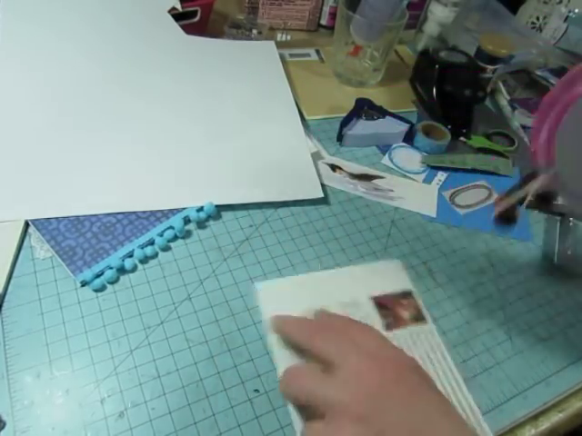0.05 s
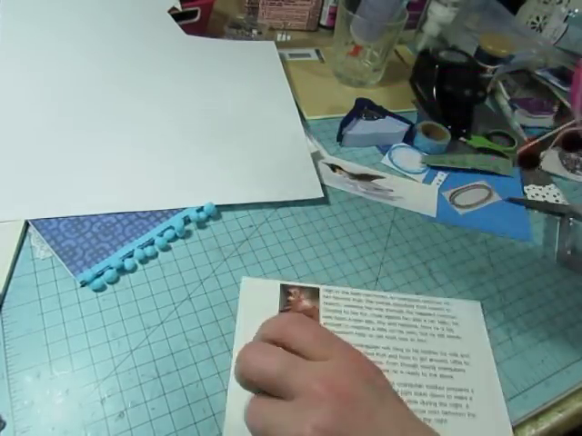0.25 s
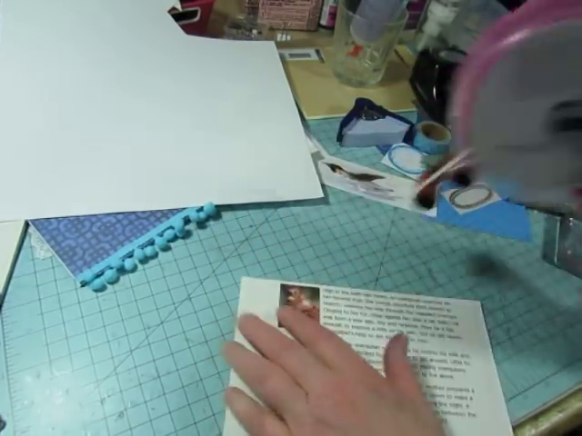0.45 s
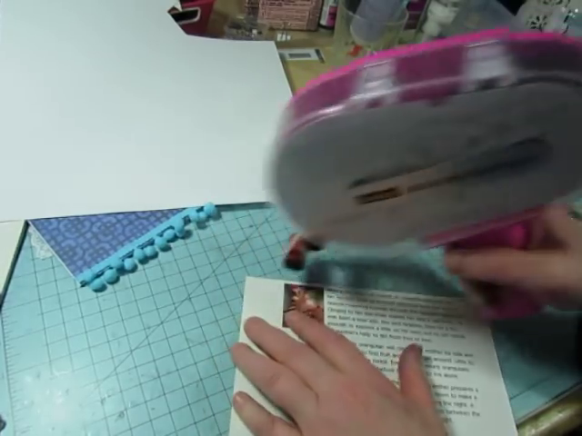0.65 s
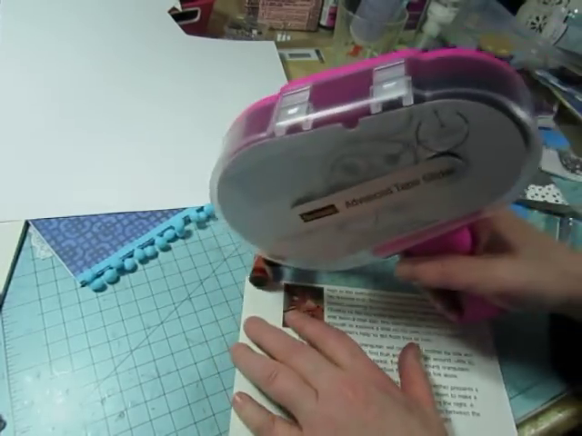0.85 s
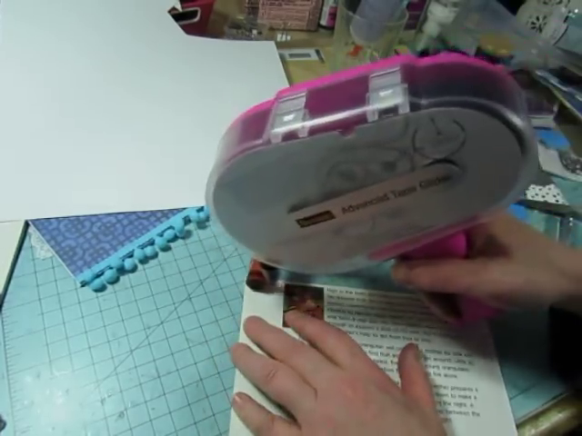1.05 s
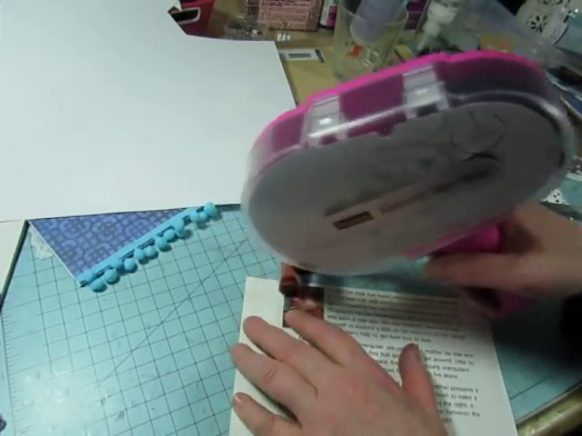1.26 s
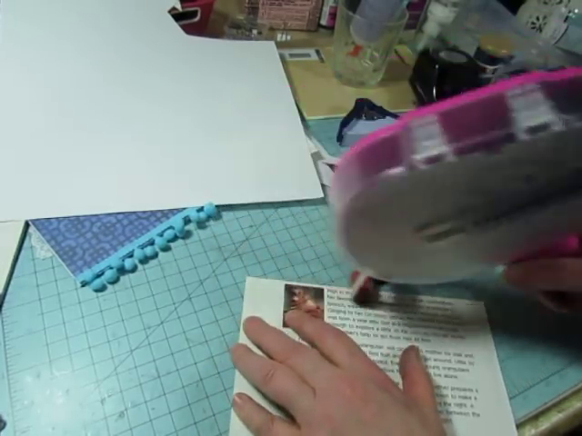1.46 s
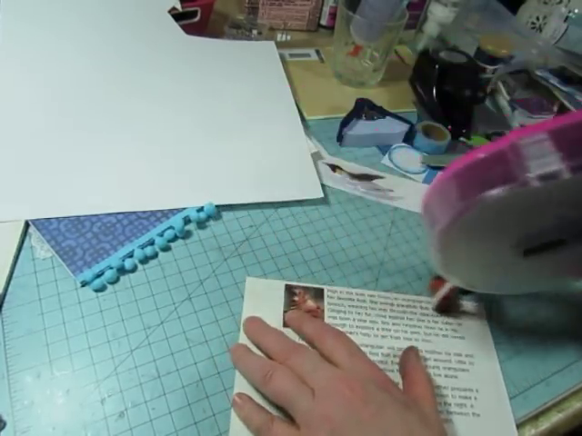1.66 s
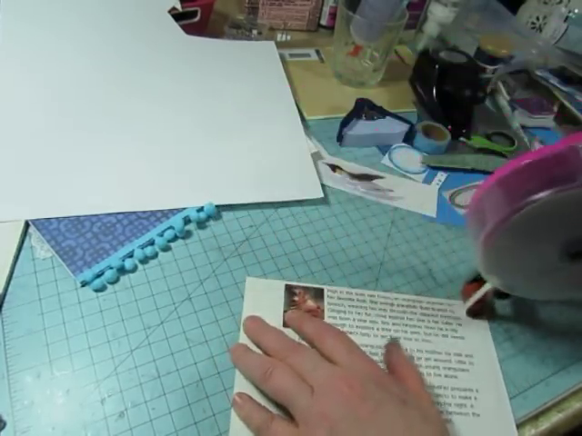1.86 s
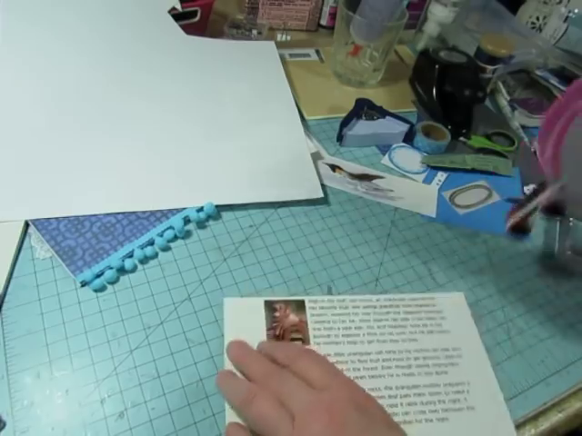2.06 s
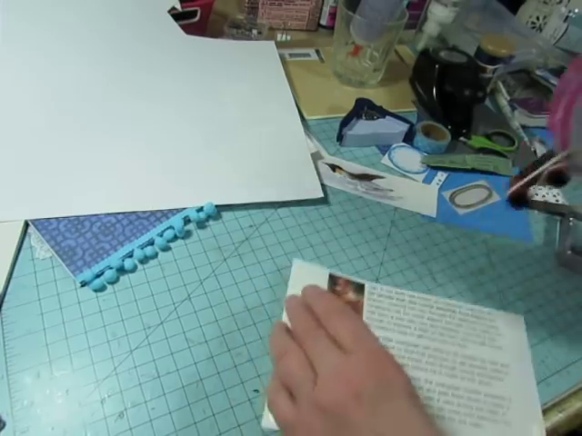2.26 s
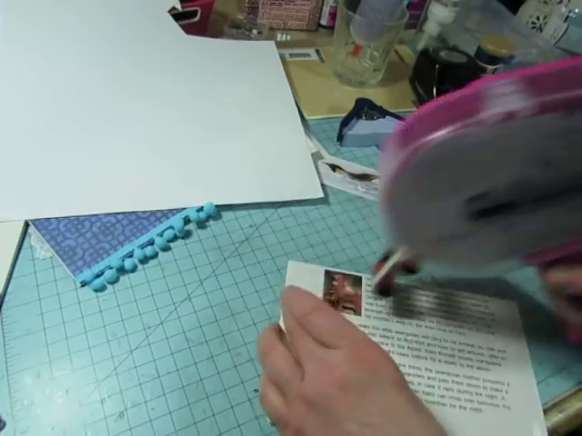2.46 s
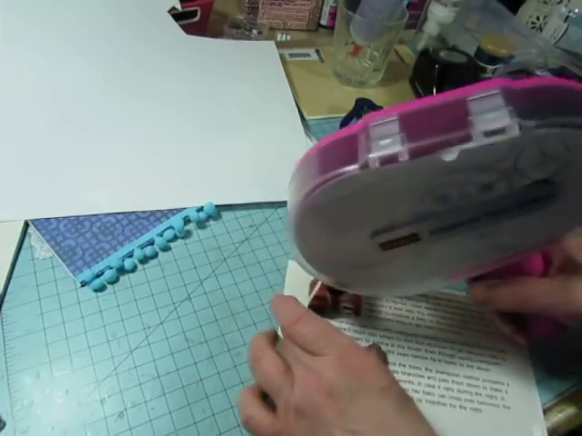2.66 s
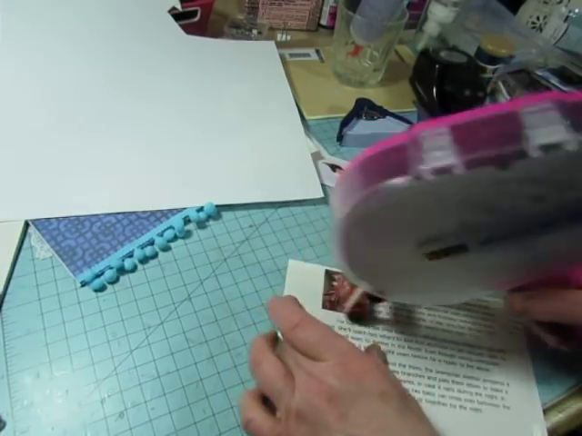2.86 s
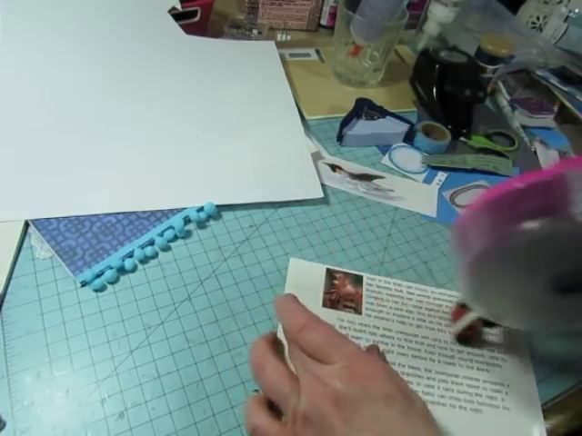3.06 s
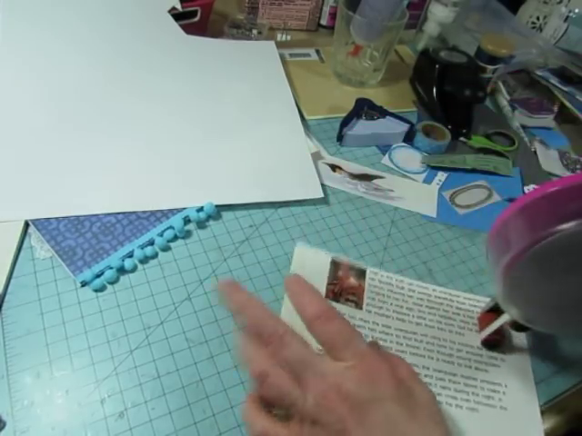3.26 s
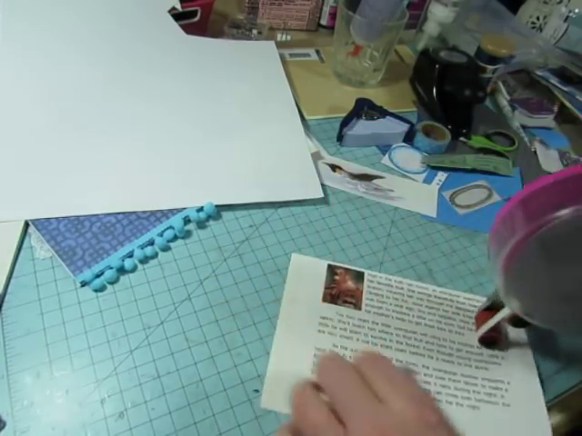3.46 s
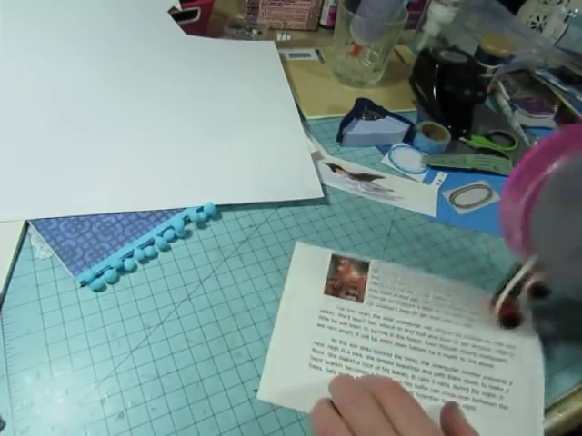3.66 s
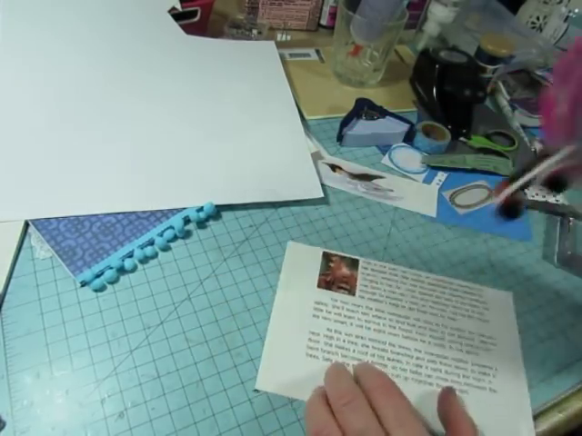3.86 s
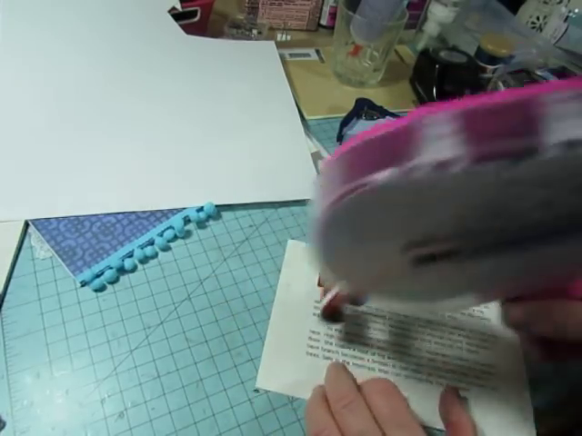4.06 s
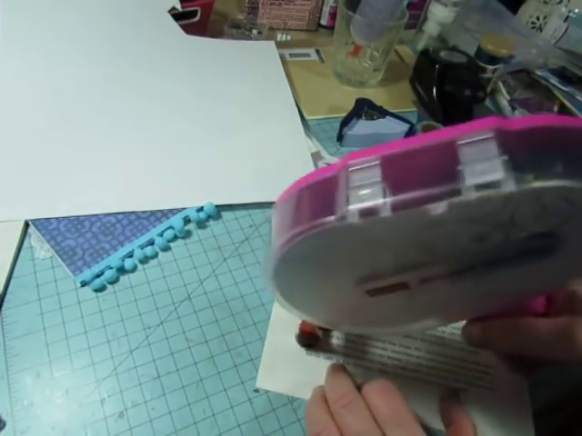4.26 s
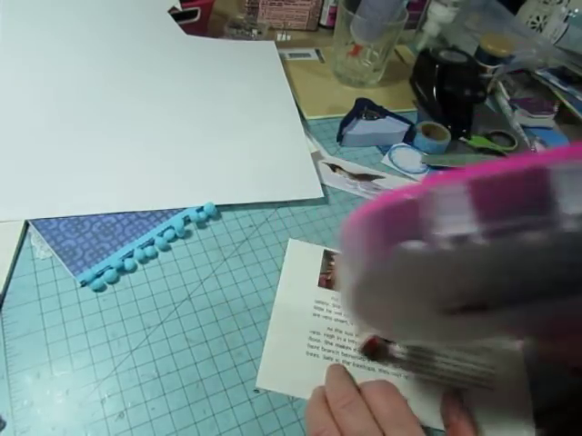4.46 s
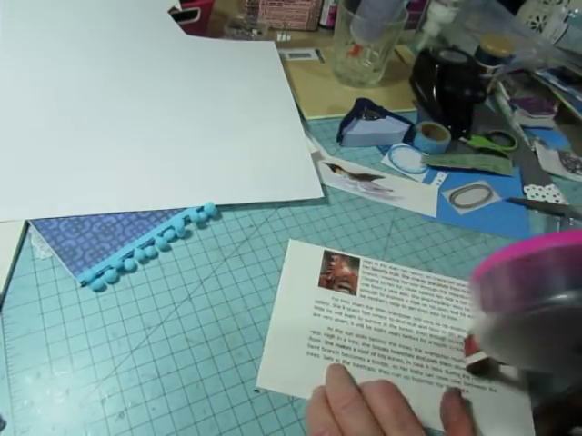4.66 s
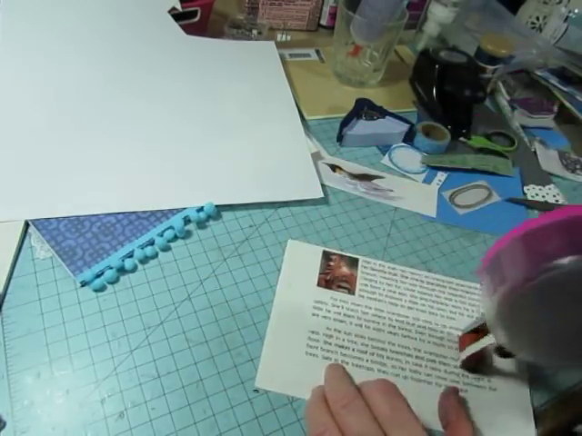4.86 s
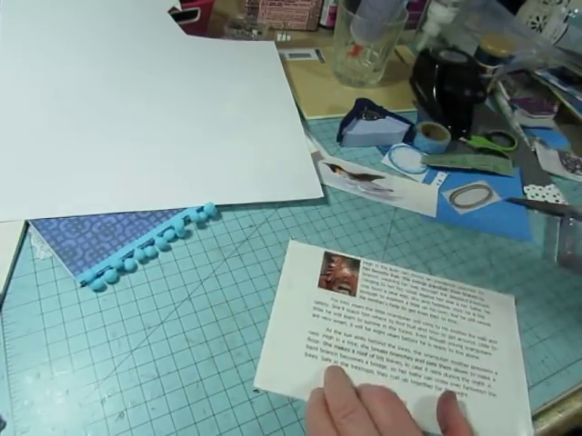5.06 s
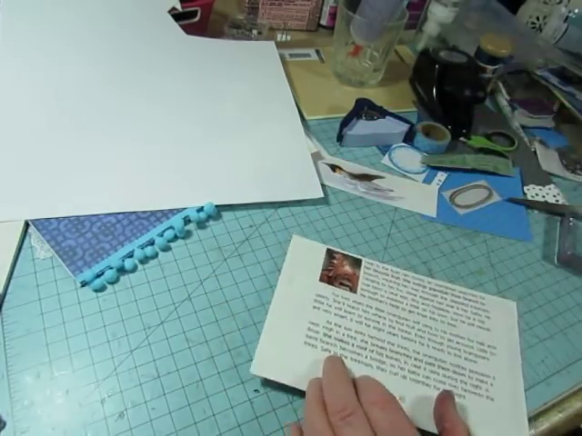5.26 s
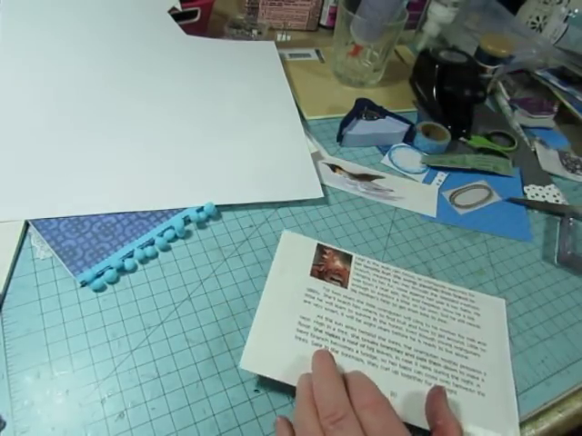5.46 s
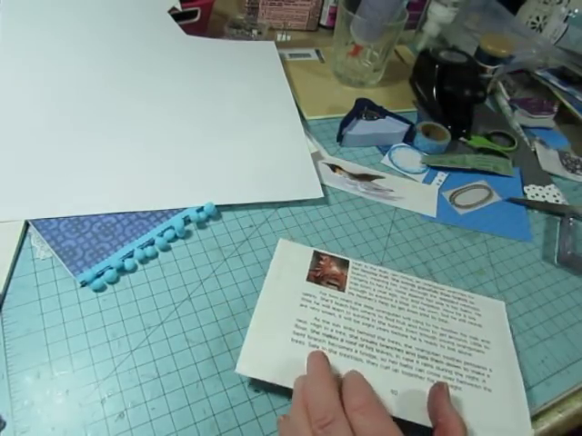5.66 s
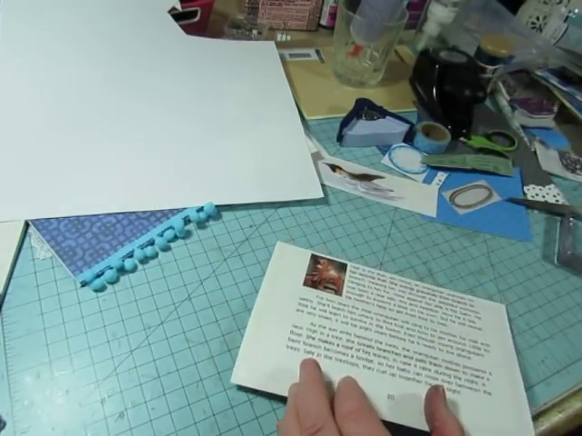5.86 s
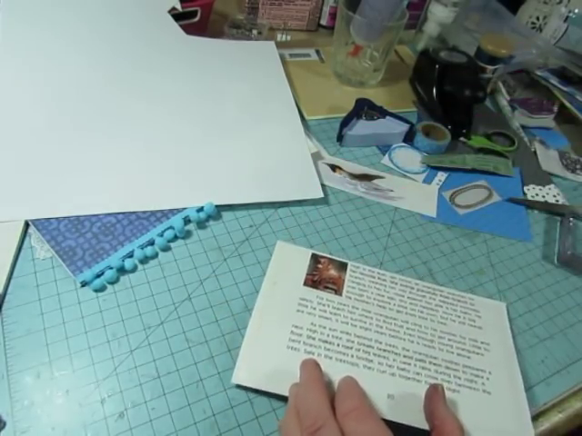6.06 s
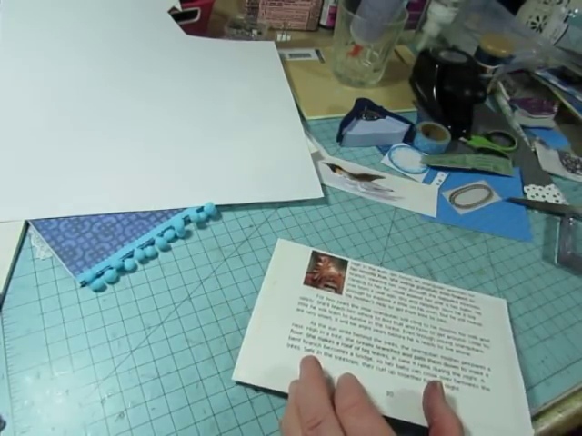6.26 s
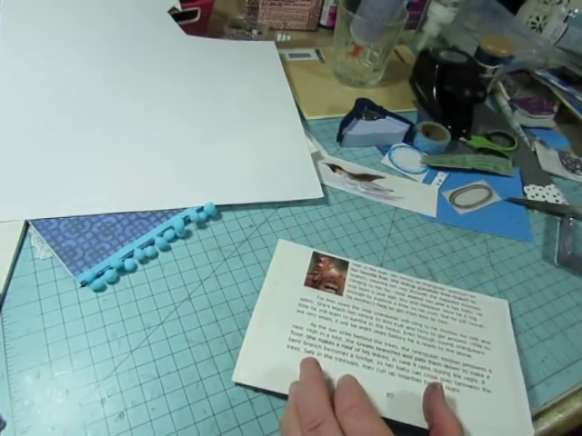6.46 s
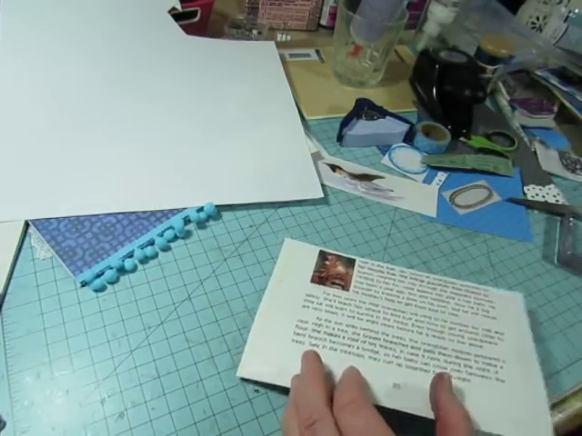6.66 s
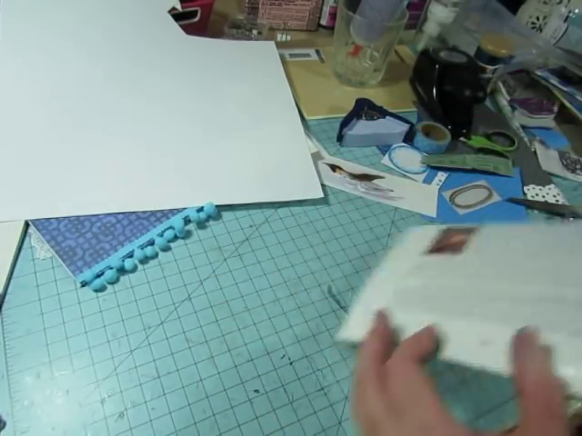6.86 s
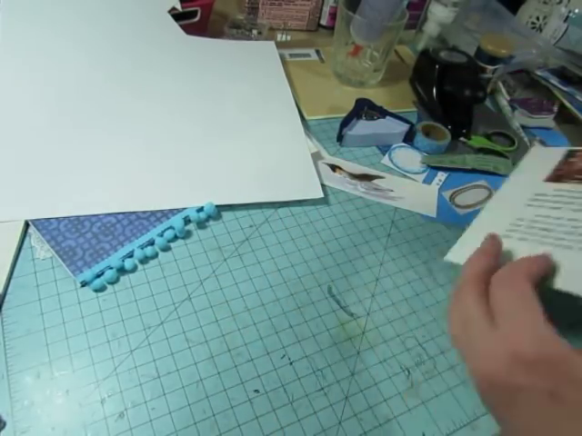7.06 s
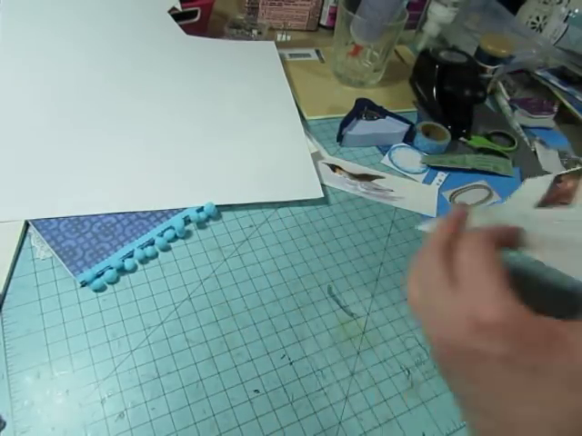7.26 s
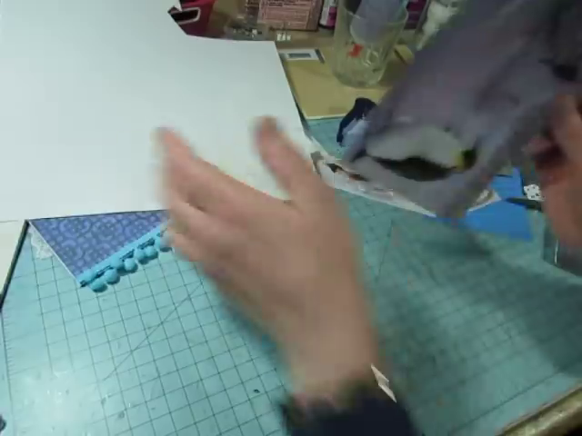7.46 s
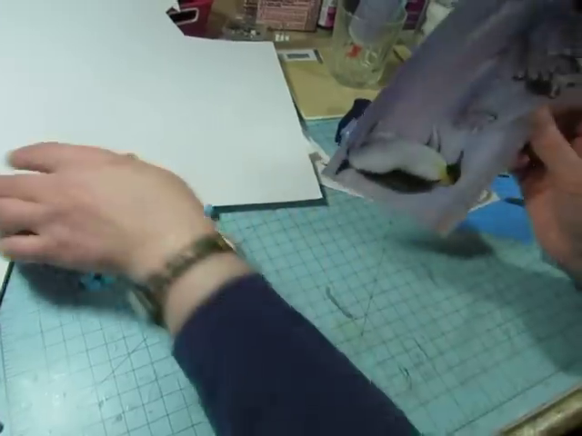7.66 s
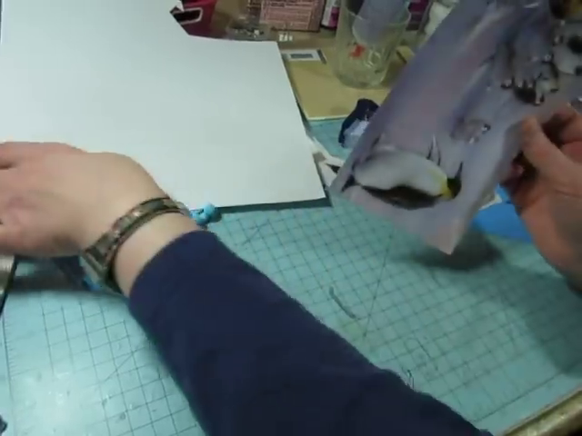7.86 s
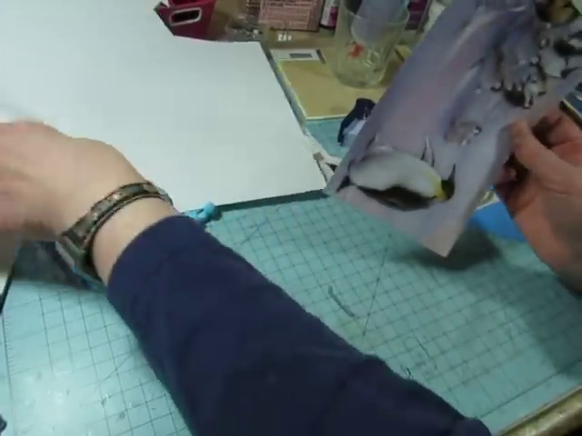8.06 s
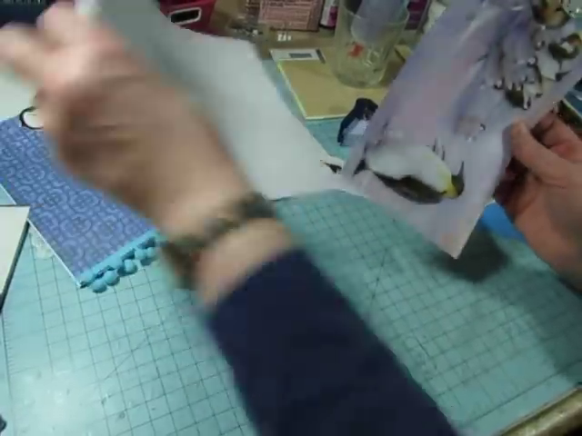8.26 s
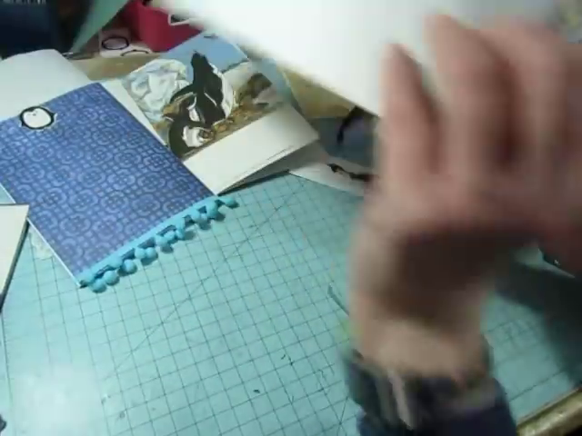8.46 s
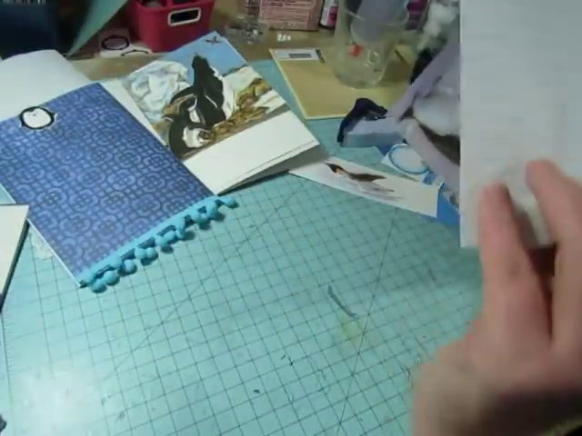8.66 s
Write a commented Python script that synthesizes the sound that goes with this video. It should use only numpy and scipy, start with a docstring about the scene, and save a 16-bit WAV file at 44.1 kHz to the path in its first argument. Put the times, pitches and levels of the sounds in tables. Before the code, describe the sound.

A plastic tape gun rattles across paper in three short strokes, clatters down on a desk, then paper is picked up.

```python
"""Desk in a small room. A hand-held tape gun is set on a paper sheet, rolled along it and lifted,
three times; then it is laid down and sheets are picked up. Gear teeth ring and rattle the hollow
plastic shell, tape hisses as it peels, paper slides and snaps, the desk thumps; the room hums below."""
import sys
import numpy as np
from scipy import signal
from scipy.fft import rfft, irfft, next_fast_len
from scipy.io import wavfile
from scipy.ndimage import uniform_filter1d

SR = 44100
rng = np.random.default_rng(int(sys.argv[2]) if len(sys.argv) > 2 else 0)


def dump_mix(stems):
    """Bounce the given channels to the path in sys.argv[1] as a 16-bit WAV at rate SR."""
    frames = np.atleast_2d(stems).T  # one column per channel
    limited = np.clip(frames, -1, 1)  # hard clip at full scale
    pcm = np.round(limited * 32767).astype(np.int16)
    wavfile.write(sys.argv[1], SR, pcm)


N = 384111

# one curve per stroke along the sheet: t/s, shell ring/dB, peel hiss/dB
ROLL_STROKES = [
    [(1.3, -57, -59), (1.35, -46.5, -51.5), (1.47, -27, -45), (1.584, -27.5, -40.5), (1.834, -26.5, -44),
     (1.94, -36.5, -57), (1.98, -52, -74)],
    [(2.87, -39, -53), (2.924, -35, -45.5), (3.04, -28.5, -39), (3.13, -19.5, -35), (3.21, -19.5, -37),
     (3.25, -26, -41.5), (3.314, -37, -59), (3.36, -56, -60)],
    [(4.46, -58, -71), (4.52, -31.5, -45.5), (4.618, -20, -37.5), (4.766, -22.5, -41), (4.856, -43.5, -59),
     (4.91, -53, -74)],
]
# hiss of peeling tape and paper edges: f/Hz, density/dB
HISS_SPECTRUM = [(2120, -20), (3600, -5), (4010, -6.5), (4790, -1.5), (8140, -7.5), (12800, -10.5),
                 (15000, -28), (15600, -34), (16300, -77)]


def tape_gun():
    """Uneven tooth contacts ring the shell and rattle the gears; tape peels with a finer hiss."""
    # grip, set down, lift: peak t/s, ring/dB, rise/s, fall/s, rattle re ring/dB, hiss re ring/dB
    moves = [(0.012, -38.5, .03, 0.094, -8, -22), (0.656, -44.5, 0.27, 0.29, -5, -11),
             (1.085, -46, .03, 0.033, 9, -4), (1.118, -36.5, 0.14, 0.5, -6, -20),
             (1.218, -29.5, 0.024, 0.28, -3.5, -21), (2.046, -32, .15, 0.15, -7, -19.5),
             (2.13, -28.5, 0.032, 0.12, -3.5, -11), (2.772, -25.5, 0.021, 0.18, 4.5, -16),
             (3.602, -29.5, 0.055, 0.072, -9.5, -24), (3.68, -30.5, 0.028, 0.085, -0.5, -4),
             (3.787, -29, 0.13, 0.02, -6, -16), (3.867, -32, 0.26, 0.16, 2.5, -12),
             (4.129, -38.5, 0.098, 0.13, -1.5, -9.5), (4.337, -28.5, 0.0025, 0.28, -0.5, -15),
             (4.404, -25, 0.067, 0.068, 3, -24), (4.934, -23.5, 0.026, 0.27, 0, -13),
             (5.02, -44, 0.37, 0.048, 0, -39), (5.404, -47.5, 0.17, 0.17, 0.2, -6.5),
             (5.606, -45.5, 0.21, 0.12, 4, -14)]
    gear_spectrum = [(590, -55), (1000, 3), (1400, 3), (1590, 0), (2010, 3.5), (2470, -3.5), (3410, -4.5),
                     (3720, -8), (4010, -16.5), (4400, -12), (5720, -51), (9680, -120)]  # f/Hz, density/dB
    roll_rattle_db = -2.5
    roll, unwind = curve_gains(ROLL_STROKES)
    ring, rattle, peel = swells(moves) + [roll, amp(roll_rattle_db) * roll, unwind]
    judder = amp(1.8 * drift(rate_hz=40))  # roller grips and slips
    teeth = grains(per_s=1500, spread_db=0.93, friction=1) * judder
    tape = grains(per_s=4000, spread_db=3.7, friction=1) * judder
    load_db = 0.55 * np.clip(20 * np.log10(ring + 1e-9) + 24, -15, 15)  # harder push, more low modes
    return (ring * unit_rms(shell(teeth, load_db))
            + rattle * unit_rms(coloured(teeth, gear_spectrum))
            + peel * unit_rms(coloured(tape, HISS_SPECTRUM)))


def shell(x, load_db):
    """Hollow plastic: parallel modes over weak broad radiation; load scales the lowest four."""
    modes = [(216, 8, -17), (300, 51, -24.5), (410, 23, -3), (437.3, 17.8, 1.5), (599, 62, -14.5),
             (672.4, 35.2, 0.3), (770, 35, -10), (992, 33, -26)]  # f/Hz, width/Hz, level/dB
    rings = [(-1) ** k * amp(db) * resonance(x, hz, width) for k, (hz, width, db) in enumerate(modes)]
    return amp(load_db) * sum(rings[:4]) + sum(rings[4:]) + amp(-14) * band(x, 248, 1055)


def gun_laid_down():
    """Loose parts clatter as the gun settles on the desk top."""
    # settling: peak t/s, ring/dB, rise/s, fall/s, rattle re ring/dB, hiss re ring/dB
    moves = [(6.012, -35.5, 0.018, 0.14, -10.5, -27), (6.089, -17, 0.0041, .17, -5.5, -16),
             (6.189, -44.5, .003, 0.15, 11, 7.5), (6.292, -38.5, 0.015, .2, -14, -21),
             (6.47, -50, 0.13, .05, -11, -13), (6.495, -33, 0.016, 0.36, -12.5, -18),
             (6.55, -32.5, 0.11, 0.038, -1.5, -24), (6.582, -15.5, .015, 0.13, -3, -14),
             (6.662, -30.5, 0.0042, 0.14, 1, -22), (6.79, -57, 0.067, 1, -5, -9),
             (6.9, -59.5, 0.13, 0.11, 5, 10)]
    contact_spectrum = [(88, -44), (150, -10.5), (221, -4.5), (364, -8.5), (687, -1), (764, -8.5),
                        (892, -4), (1210, -19), (1290, -17), (1500, -36), (1950, -21), (3300, -120)]  # gun and desk top together: f/Hz, density/dB
    parts_spectrum = [(650, -44), (1100, -3.5), (2830, -12), (3570, -11), (3990, -22), (4400, -22),
                      (5720, -28), (9680, -120)]  # loose parts: f/Hz, density/dB
    ring, rattle, hiss = swells(moves)
    clatter = grains(per_s=900, spread_db=0.59, friction=1) * amp(1.1 * drift(rate_hz=19))
    return (ring * unit_rms(coloured(clatter, contact_spectrum))
            + rattle * unit_rms(coloured(clatter, parts_spectrum))
            + hiss * unit_rms(band(clatter, 3100, 9100)))


def knocks_and_snaps():
    """A click and dying chatter make a tick; the chatter rings the shell; snaps add a treble crack."""
    # pitched knocks and taps, handling gun and sheets: t/s, tick peak/dB, tick f/Hz, shell re tick/dB
    knocks = [(0.1156, -32.5, 1390, 9), (0.1555, -23, 1280, 3), (0.6469, -29, 1330, -2.1),
              (0.6814, -31, 1230, -5.5), (1.136, -31, 1180, 7.5), (1.2208, -14.5, 1820, -27),
              (2.012, -40, 1300, 9), (2.0335, -34, 1500, 11.5), (2.126, -39.5, 2320, 16),
              (2.157, -30.5, 1510, -0.5), (2.394, -14, 3100, -20), (2.7658, -16, 1980, -25),
              (2.8457, -11, 1820, -4.5), (3.5783, -24.5, 1440, -11), (3.683, -17, 1670, -9),
              (3.77, -24.5, 1700, 3.5), (3.8598, -14, 2050, -35), (4.121, -17.5, 1670, -42),
              (4.3335, -20.5, 1620, -14), (4.3653, -12.5, 1940, -3), (4.9254, -13, 3080, -11),
              (4.9618, -7, 1700, -8.5), (5.0809, -14, 3600, -31), (5.1014, -9, 1850, -35),
              (5.1875, -40, 1600, -22), (5.586, -25, 1210, -5.5), (6.0895, -20, 1193, 6.5),
              (6.1045, -13, 1230, -0.5), (6.1893, -15, 2050, -19), (6.5191, -19, 1800, 0.5),
              (6.5734, -7, 1110, -2.5), (6.661, -34, 1210, -8), (7.2664, -8, 2570, -21),
              (7.3562, -17.5, 2620, -10.5), (7.3744, -11, 1290, -11), (7.458, -10.5, 1330, -2.5),
              (7.4734, -7.5, 1930, -14.5), (8.2529, -5.5, 1900, -16.5)]
    snaps = [(0.062, -26, 2870, -5), (0.141, -24, 2200, -1), (0.1462, -13.5, 2800, 1),
             (0.1885, -12, 3740, 2), (0.2958, -7.5, 3450, 3), (0.3321, -4, 2850, -7),
             (0.626, -21, 2200, -7), (1.077, -31, 2500, -5), (1.159, -27.5, 2500, -1.5),
             (1.277, -35, 3000, 7.5), (2.033, -35, 2000, -16), (2.071, -32, 1350, 2),
             (2.256, -31, 1460, -14), (2.494, -11, 3400, 4.5), (2.6311, -23, 1320, 8),
             (3.3857, -4, 3800, 7.5), (3.683, -13.5, 3000, -12), (5.039, -32, 3000, 5),
             (5.048, -2.5, 3470, 0), (6.1943, -18, 1860, 6.5), (6.7954, -26, 1260, 1),
             (7.356, -29, 1300, -1), (7.7122, -22, 2180, 2.5), (8.2452, -4, 3300, -4),
             (8.2542, -11, 2550, -4), (8.509, -28, 2500, 4), (8.5266, -17.5, 2240, 5)]  # paper and tape: t/s, tick peak/dB, tick f/Hz, crack re tick/dB
    echoes = [(.0035, -4.5), (.009, -8), (.02, -41)]  # off desk and clutter: delay/s, level/dB
    knock_ping, knock_t60_s = 3.2, 0.18  # ping: gain of the tick's pitched part
    snap_ping, snap_t60_s, snap_shell_db = 1, 0.036, -25.5
    hits = [(s, db, hz, body_db, -np.inf, knock_ping, knock_t60_s) for s, db, hz, body_db in knocks]
    hits += [(s, db, hz, snap_shell_db, crack_db, snap_ping, snap_t60_s) for s, db, hz, crack_db in snaps]
    size = 4096
    out, t = np.zeros(N + size), np.arange(size) / SR
    for start_s, db, tick_hz, body_db, crack_db, ping, t60_s in hits:
        noise = rng.standard_normal(size)
        fade = decay(t, t60_s)
        onset = 1 - np.exp(-t / 0.0015)
        body = shell(noise * fade * onset, load_db=-14.5) * decay(t, 0.15)
        click = 7 * noise * decay(t, 0.002)
        click = click + sum(amp(echo_db) * np.roll(click, round(lag_s * SR)) for lag_s, echo_db in echoes)
        tick = click + noise * fade ** 2
        tick = band(tick, 0.5 * tick_hz, min(2.2 * tick_hz, 4200)) + ping * resonance(tick, tick_hz, 310)
        tick = band(tick, 140, 2.6 * tick_hz)  # soft contact dulls the top
        crack = band(click + noise * decay(t, 0.067 * t60_s), 3300, 11300)
        parts = [(tick, db), (body, db + body_db), (crack, db + crack_db)]
        at = round(start_s * SR)
        out[at:at + size] += sum(amp(peak_db) * x / np.abs(x).max() for x, peak_db in parts)
    return out[:N]


def paper():
    """Fibre crackle on sliding noise; the sheet flaps below, its edge hisses above."""
    # slide, turn, pick up: peak t/s, rustle/dB, rise/s, fall/s, flap re rustle/dB, hiss re rustle/dB
    moves = [(0.02, -65.5, 0.06, 0.13, 19, 9), (0.152, -40, 0.071, 0.27, 4.5, 7.5),
             (0.27, -51, 0.013, 0.18, -39, 9), (0.326, -33.5, 0.1, 0.094, -9, 8),
             (2.33, -62.5, 0.17, 0.27, 7, 12.5), (2.386, -58, 0.19, 0.037, -10, 18),
             (2.398, -39.5, 0.0078, 0.14, -6, 3), (2.499, -46.5, 0.03, 0.17, -8, 8.5),
             (2.637, -51.5, .005, 0.11, 4, 12), (3.35, -50, 0.11, 0.08, 8.5, 10),
             (3.391, -38.5, 0.0075, 0.12, -4, 11), (5.053, -36, 0.0027, 0.054, 6.5, 11.5),
             (5.099, -31.5, 0.037, .13, -8, -11.5), (5.193, -30.5, .005, 0.05, -15, -38),
             (7.256, -35, 0.01, .05, 2.5, -30), (7.272, -14.5, 0.021, 0.04, -24, -45),
             (7.31, -35.5, .05, 0.19, -3.5, -12.5), (7.378, -18.5, 0.0088, 0.024, -15, -21),
             (7.436, -33.5, 0.052, 0.1, -39, 3.5), (7.474, -23, 0.066, 0.097, -4, -41),
             (7.64, -60.5, 0.21, .3, 16.5, 7.5), (7.713, -57, 0.03, 0.033, 3, 10),
             (7.82, -61.5, 0.9, 0.97, -5, 2.1), (8.133, -35.5, 0.1, 0.33, -10.5, -5.5),
             (8.22, -49.5, 0.14, 0.082, -40, 19), (8.248, -18.5, 0.015, 0.076, -18, 2),
             (8.345, -32.5, 0.16, 0.05, -11.5, -34), (8.47, -43, 0.33, 0.16, -18, 3.5),
             (8.524, -39.5, 0.0084, 0.2, -5, 4), (8.607, -40.5, 0.12, 0.11, 7, -24),
             (8.7, -52.5, 0.16, .2, 9, 4.5)]
    rustle_spectrum = [(530, -20), (900, 10), (1820, 9.5), (1970, 13), (2120, 10), (3490, 5.5), (3930, -13),
                       (4400, -14.5), (5720, -52), (9680, -120)]  # f/Hz, density/dB
    flap_spectrum = [(71, 1), (120, -11), (183, -4.5), (376, 0), (420, 1), (464, 0), (1700, -13.5),
                     (2210, -77), (3740, -120)]  # f/Hz, density/dB
    rustle, flap, hiss = swells(moves)
    crackle = grains(per_s=3000, spread_db=0.4, friction=2.3) * amp(2.06 * drift(rate_hz=102))
    return (rustle * unit_rms(coloured(crackle, rustle_spectrum))
            + flap * unit_rms(coloured(crackle, flap_spectrum))
            + hiss * unit_rms(coloured(crackle, HISS_SPECTRUM)))


def desk():
    """Thumps and roller rumble carried by the desk, partly on a separate path to each side."""
    thumps = [(0.34, -61, -38, 0.05), (1.23, -55, -52, 0.82), (1.42, -60, -48, 0.63),
              (2.775, -33, -38, 0.34), (2.85, -48, -33, 0.14), (3.69, -46, -47.5, 0.31),
              (4.345, -34, -36.5, 0.35), (4.94, -45, -50, 0.34), (6.1, -36, -35.5, 0.43),
              (6.52, -48, -36, 0.21), (6.585, -27.5, -27, 0.1), (7.275, -62, -52, 0.2),
              (7.47, -61, -43, .25), (7.66, -35, -49, 0.2), (8.56, -66, -64, 0.31), (8.69, -58, -44, .3)]  # peak t/s, boom/dB, panel/dB, fall/s
    boom_spectrum = [(8.8, -33), (15, -8.5), (49, -2), (63, -1), (85, -76), (110, -54), (190, -120)]  # deep boom: f/Hz, density/dB
    panel_spectrum = [(50, -63), (85, -5), (178, -12), (210, -2.5), (247, -11.5), (280, -7), (360, -36),
                      (620, -120)]  # top panel: f/Hz, density/dB
    rise_s, roll_panel_db, rest_boom_db, rest_panel_db = 0.037, -36, -58, -57
    boom, panel = swells([(s, db, rise_s, fall_s, panel_db - db) for s, db, panel_db, fall_s in thumps])
    roll, _ = curve_gains(ROLL_STROKES)
    boom += amp(rest_boom_db)
    panel += amp(roll_panel_db) * roll + amp(rest_panel_db)
    out = 0
    for spectrum, gain in ((boom_spectrum, boom), (panel_spectrum, panel)):
        mid, side = coloured(rng.standard_normal((2, N)), spectrum)
        out = out + gain * unit_rms(mid + 0.21 * side * [[1], [-1]])
    return out


def treble_spread(x):
    """Treble leaves many points of sheet and shell at once, so part of it differs left to right."""
    envelope = np.sqrt(np.abs(uniform_filter1d(band(x, 6300, 14000) ** 2, size=32)))
    side = amp(1.5) * band(envelope * rng.standard_normal(N), 4400, 12600)
    return side * [[1], [-1]]


def reflections(x, t60_s=0.091, patterns=3, shifts_per_s=2.882):
    """Dense stereo tails, crossfaded in a cycle: the pattern shifts as the hands move."""
    echo_spectrum = [(60, 19), (300, -14), (1000, -7), (4000, -5.5), (12000, -6.5)]  # f/Hz, reflected re direct/dB
    t, out = np.arange(SR // 4) / SR, 0
    position = np.arange(N) / SR * shifts_per_s % patterns
    for k in range(patterns):
        tail = rng.standard_normal((2, len(t))) * decay(t, t60_s) * (t > 0.001)
        tail /= np.sqrt(np.sum(tail ** 2, axis=1, keepdims=True))
        distance = np.abs((position - k + patterns / 2) % patterns - patterns / 2)
        weight = np.cos(np.pi / 2 * np.minimum(distance, 1))
        out = out + signal.oaconvolve([x * weight], tail, axes=1)[:, :N]
    return coloured(out, echo_spectrum)


def room_tone(mid_db=-51):
    """Steady hum and hiss, more side than mid."""
    mid_spectrum = [(12, -45), (20, -21), (49, -21), (79, -38), (108, -0.5), (143, -18.5), (340, -11),
                    (438, -8.5), (613, -5.5), (667, -6), (1040, -11), (3800, -20), (10700, -25.5),
                    (15000, -39), (16300, -74)]  # f/Hz, density/dB
    side_spectrum = [(60, 8), (110, 11), (200, 20.5), (380, 11), (700, 4), (1290, 3.5), (2380, 1.5),
                     (4400, 0), (8120, -0.5), (15000, -1)]  # f/Hz, side re mid/dB
    mid, side = rng.standard_normal((2, N))
    mid, side = coloured(mid, mid_spectrum), coloured(side, mid_spectrum, side_spectrum)
    return amp(mid_db) * (mid + side * [[1], [-1]]) / np.std(mid)


def swells(moves, depth_db=30):
    """Gains of a main layer and its companions; each move spans depth_db per rise or fall time."""
    out = np.zeros((len(moves[0]) - 3, N))
    for peak_s, db, rise_s, fall_s, *companions_db in moves:
        first, last = round((peak_s - 2 * rise_s) * SR), round((peak_s + 2 * fall_s) * SR)
        at = np.arange(max(first, 0), min(last, N))
        below_db = depth_db * np.maximum((peak_s - at / SR) / rise_s, (at / SR - peak_s) / fall_s)
        out[:, at] += amp(db - below_db) * amp([0, *companions_db])[:, None]
    return out


def curve_gains(curves):
    """One gain per dB column, summed over curves; each is silent outside its span."""
    t = np.arange(N) / SR
    return sum(amp([np.interp(t, times_s, db, left=-200, right=-200) for db in columns])
               for times_s, *columns in map(np.transpose, curves))


def grains(per_s, spread_db, friction):
    """Random clicks of uneven size over friction noise."""
    sizes = amp(spread_db * np.minimum(rng.exponential(1, N), 5)) * rng.choice([-1, 1], N)
    clicks = unit_rms(sizes * (rng.random(N) < per_s / SR))
    return unit_rms(clicks + friction * rng.standard_normal(N))


def drift(rate_hz):
    """Low-passed noise, unit rms."""
    r = np.exp(-2 * np.pi * rate_hz / SR)
    return unit_rms(signal.lfilter([1], [1, -2 * r, r * r], rng.standard_normal(N + SR))[SR:])


def coloured(x, *spectra):
    """Filter by the summed dB shapes; steep fall below the first shape's lowest point."""
    size = next_fast_len(x.shape[-1])
    log_hz = np.log(np.maximum(np.arange(size // 2 + 1) * SR / size, 1))
    db = sum(np.interp(log_hz, np.log(hz), level_db) for hz, level_db in map(np.transpose, spectra))
    db -= 40 * np.clip(np.log(spectra[0][0][0]) - log_hz, 0, 3)
    return irfft(rfft(x, size) * amp(db), size)[..., :x.shape[-1]]


def band(x, low_hz, high_hz):
    """Causal band-pass."""
    return signal.sosfilt(signal.butter(2, [low_hz, high_hz], "band", fs=SR, output="sos"), x)


def resonance(x, hz, width_hz):
    """Two-pole resonator, unit peak gain."""
    r = np.exp(-np.pi * width_hz / SR)
    gain = (1 - r * r) / 2
    return signal.lfilter([gain, 0, -gain], [1, -2 * r * np.cos(2 * np.pi * hz / SR), r * r], x)


def decay(t, t60_s):
    return amp(-60 * t / t60_s)


def amp(db):
    return 10 ** (np.asarray(db) / 20)


def unit_rms(x):
    return x / np.sqrt(np.mean(x ** 2) + 1e-20)


def scene():
    """Gun and paper panned with the hands, over desk and room."""
    hand_pan = [(0, 0), (1.5, 0), (3.2, -1), (4.5, 0), (5.2, -1.5), (6.1, -2), (7.5, -1.5), (8.1, 3),
                (8.4, 2.5), (8.6, -0.5)]  # t/s, left re right/dB
    near = tape_gun() + gun_laid_down() + paper() + knocks_and_snaps()
    pan_db = np.interp(np.arange(N) / SR, *np.transpose(hand_pan))
    direct = near * amp([pan_db / 2, -pan_db / 2])
    return direct + treble_spread(near) + reflections(near) + desk() + room_tone()


def record(dry, ceiling=1.15, stopband_hz=16200):
    """Two narrow treble dips, soft clipping, steep low-pass."""
    dips = [(3960, 180, -40), (8110, 220, -37)]  # f/Hz, width/Hz, gain/dB
    for hz, width_hz, db in dips:
        dry = dry - (1 - amp(db)) * resonance(dry, hz, width_hz)
    rounded = ceiling * np.tanh(dry / ceiling)
    return signal.sosfilt(signal.cheby2(12, 70, stopband_hz, fs=SR, output="sos"), rounded)


dry = scene()
out = record(dry)
dump_mix(out)
```